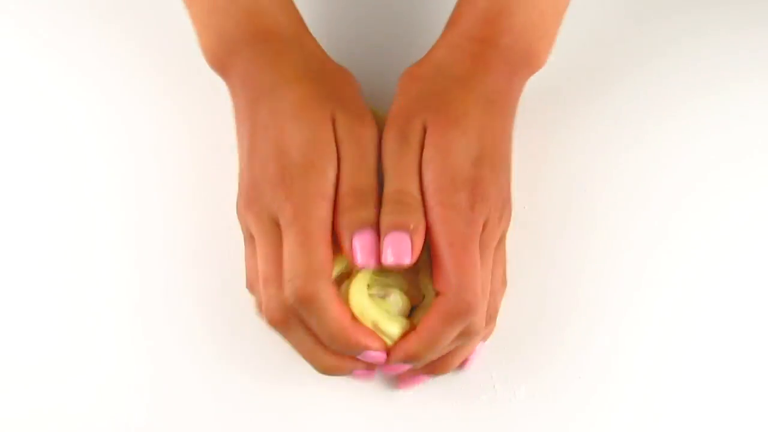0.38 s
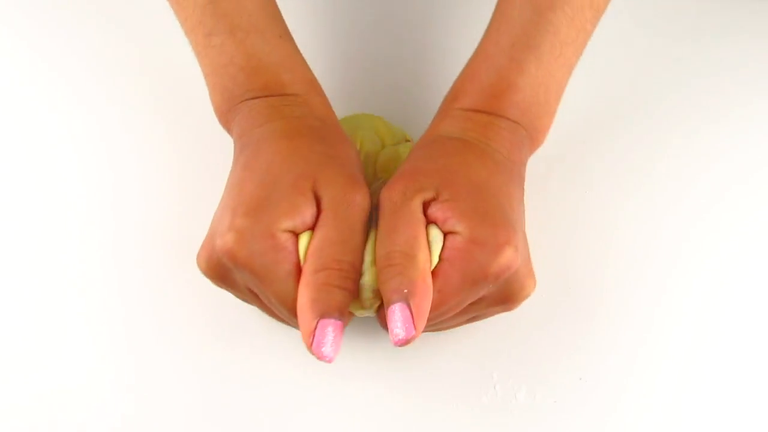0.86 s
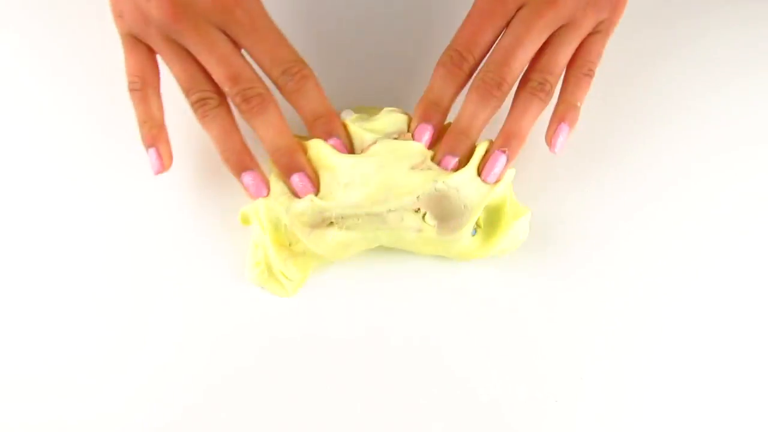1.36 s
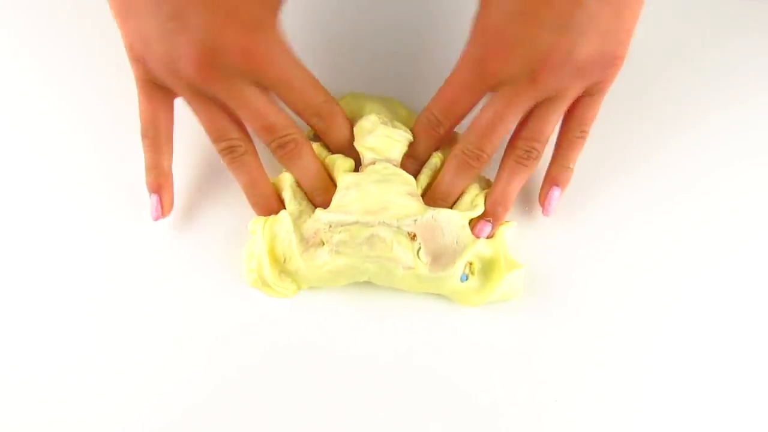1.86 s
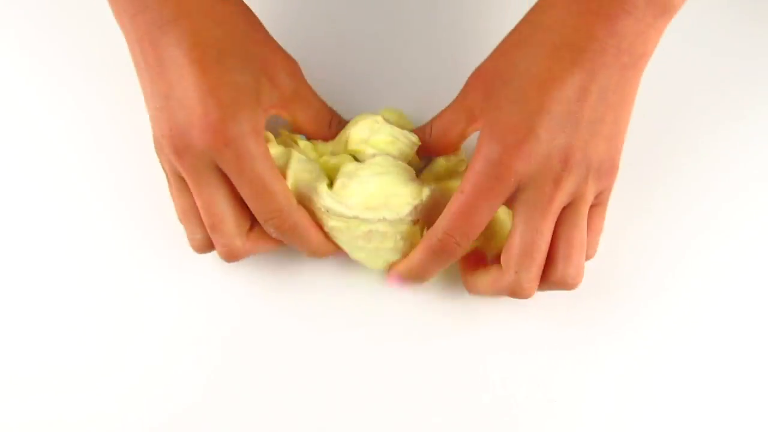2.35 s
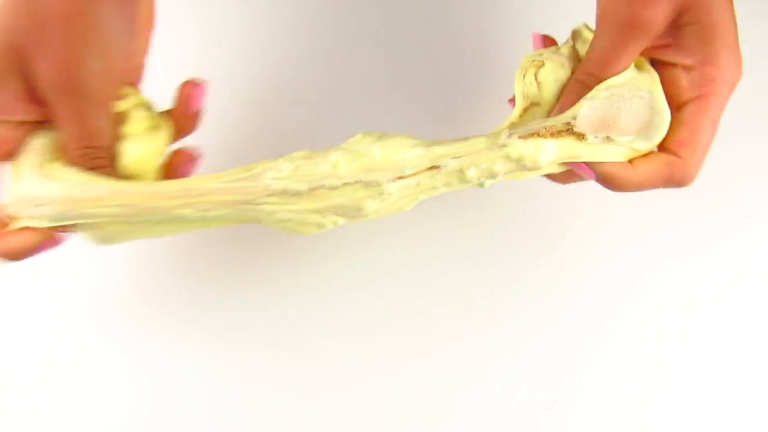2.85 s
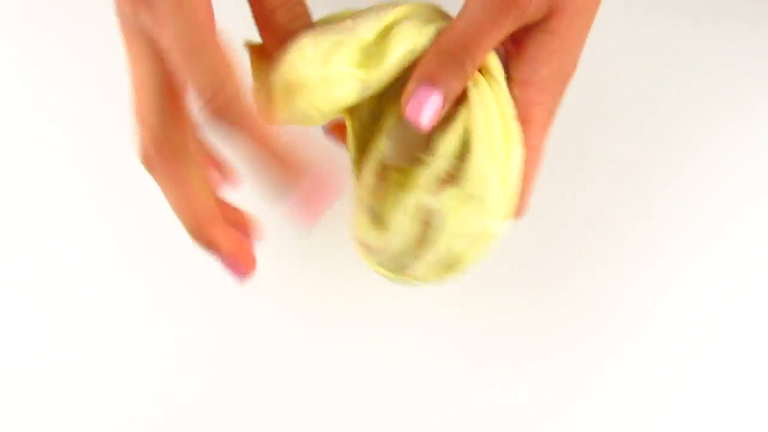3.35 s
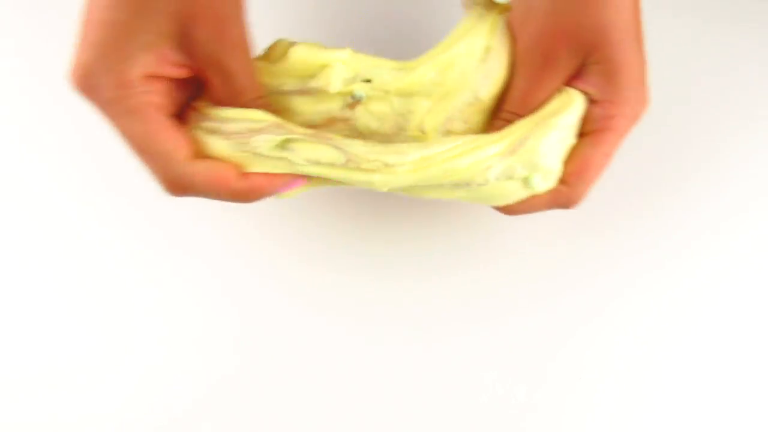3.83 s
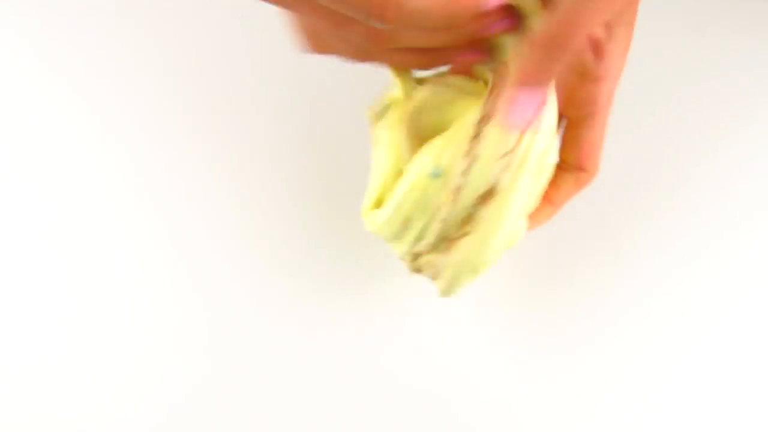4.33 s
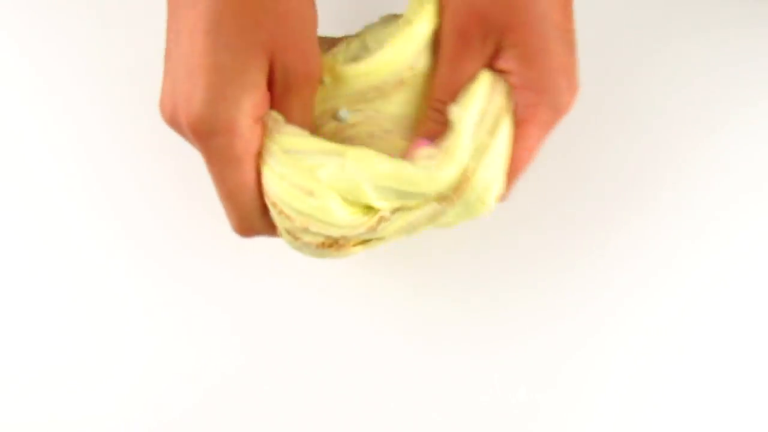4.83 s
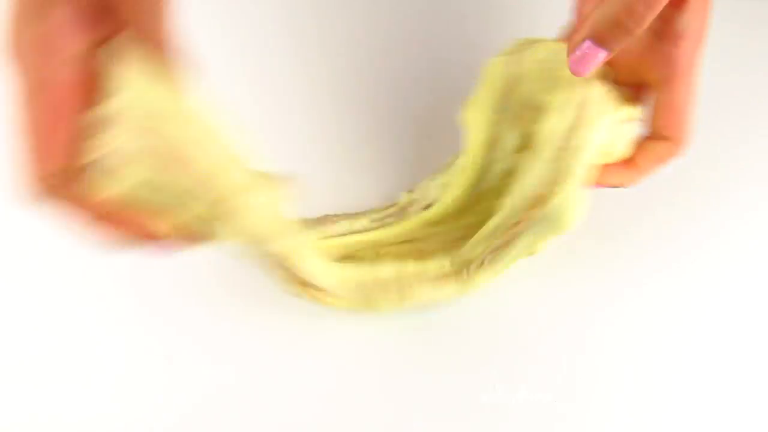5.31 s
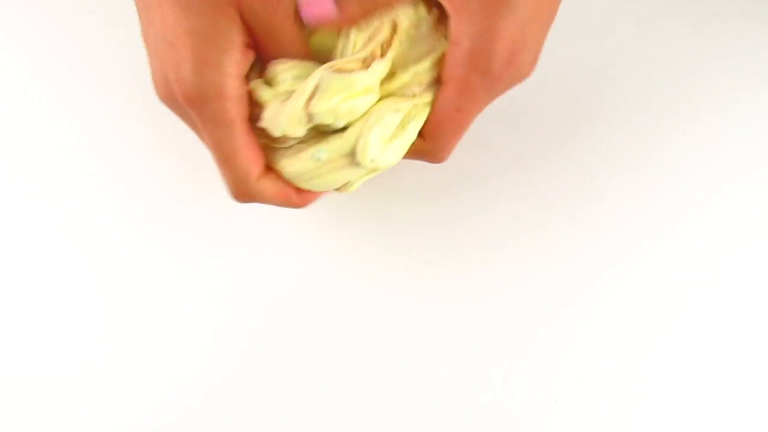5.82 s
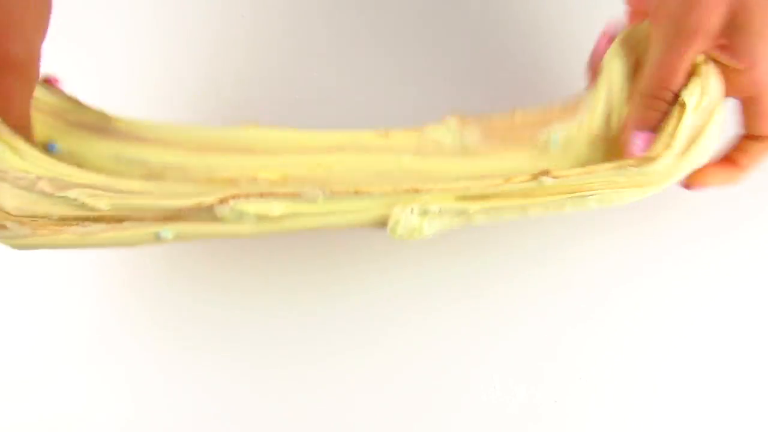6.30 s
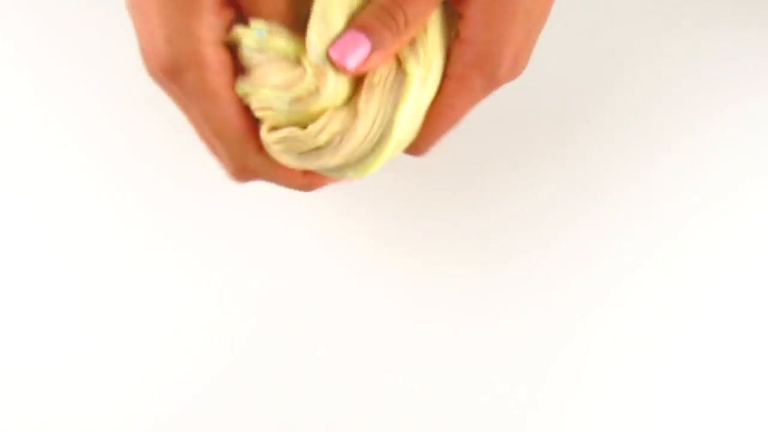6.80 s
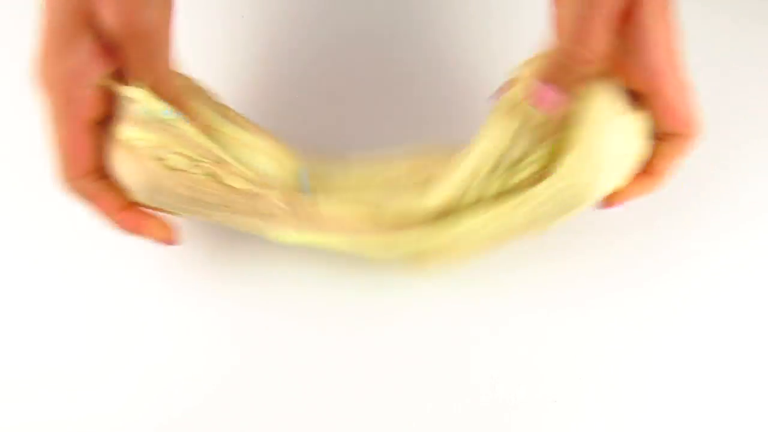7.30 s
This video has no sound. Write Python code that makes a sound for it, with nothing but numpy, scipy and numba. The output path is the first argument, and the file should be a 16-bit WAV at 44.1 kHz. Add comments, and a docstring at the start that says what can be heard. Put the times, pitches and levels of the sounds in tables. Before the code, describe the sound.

Thick slime is kneaded by hand over a table, heard very close in stereo in a small quiet room with a low ventilation hum. It opens with a small sticky peel and soft low bumps around 0.1 s, then a rustling squelch. From 0.5 to 0.9 s air pockets burst in a tight volley of loud, bright, hollow snaps, the strongest near 0.75 and 0.8 s, over wet peeling that trails to about 1.15 s. Then it is sparse: small clicks at 1.3 and 1.5 s, a peel with a dull thump near 1.9 s, wet ticks from 2.2 s and a firm pop at 2.55 s. Fine sticky crackle grows from 2 to 4 s and stays to the end, dotted with little pops. A lone loud pop lands at 5.0 s, short peels follow at 5.2 and 6.3 s, and a last flurry of snaps and squelch runs from 6.85 to 7.4 s.

```python
"""Two hands knead, stretch and fold thick slime over a table, close to a stereo microphone in a small quiet room.
In the first second air pockets burst loudly, sticky skin peels off with a squelch and the lump bumps the table;
smaller pops and peels follow, a steady crackle grows from 2 s to 4 s, a lone loud pop comes near 5 s and
a last flurry near 7 s. Pops and threads are clicks ringing resonators, bumps are pushes ringing the table modes.
Shaped noise gives the ventilation hum under it all; a gain control ducks everything after the loudest pops."""
import sys
import numpy as np
from scipy import signal
from scipy.fft import rfft, irfft, next_fast_len
from scipy.io import wavfile
from scipy.ndimage import uniform_filter1d
from numba import njit

SR = 44100
rng = np.random.default_rng(int(sys.argv[2]) if len(sys.argv) > 2 else 0)


def field_ratio(decibels):
    """Amplitude ratio for a level in dB (20 dB per decade); scalars and array-likes work."""
    return 10 ** (np.asarray(decibels, dtype=float) / 20)


def dump_mix(stems):
    """Bounce the given channels to the path in sys.argv[1] as a 16-bit WAV at rate SR."""
    frames = np.atleast_2d(stems).T  # one column per channel
    limited = np.clip(frames, -1, 1)  # hard clip at full scale
    pcm = np.round(limited * 32767).astype(np.int16)
    wavfile.write(sys.argv[1], SR, pcm)


N = 327222  # length in samples

# resonances of the hollow of the cupped lump: centre_hz, width_hz, gain_db
LUMP = [(239.7, 140, -12.5), (464, 84, 7), (934, 590, -7.5), (1384, 255, 9.5), (2105, 220, 3.5)]
# resonances of the thin film as it snaps: centre_hz, width_hz, gain_db
FILM = [(6760, 1180, -5.5), (8430, 4050, 3), (12300, 3300, -4)]


def pops():
    """Impulse excitation: a pocket tears in a volley of clicks that ring the pocket, the hollow lump and the film."""
    # bursting pockets, levels before the room: start_s, pocket_db, pocket_hz, lump_db, film_db
    bursts = [(0.071, -50, 4770, -50, -47), (0.116, -48.5, 4750, -48, -64), (0.515, -38, 3480, -40, -64),
              (0.584, -65, 4040, -49, -57), (0.625, -42, 5170, -37, -45), (0.6457, -32.5, 3110, -30.5, -36),
              (0.6882, -36.5, 3820, -31, -38.5), (0.699, -48.5, 3980, -46, -46.5),
              (0.712, -59, 3130, -41, -64), (0.7386, -20, 3670, -25.5, -23), (0.7796, -36, 4170, -31, -34),
              (0.7989, -22.5, 6130, -34, -14.5), (0.812, -65, 5330, -30, -20),
              (0.868, -70, 3940, -43.5, -62), (0.9069, -27, 5530, -33, -25),
              (1.281, -35.5, 6150, -46.5, -32.5), (1.45, -60.5, 4650, -70.5, -56),
              (1.49, -62.5, 3430, -50, -59.5), (1.862, -50, 3660, -53.5, -52),
              (1.872, -45, 3970, -43, -41.5), (1.93, -66, 3690, -56, -55), (2.113, -75.5, 2760, -53.5, -63),
              (2.1917, -63, 4220, -54, -72), (2.316, -53, 3830, -47.5, -59), (2.4837, -75, 2810, -46, -56),
              (2.5512, -36.5, 4900, -31.5, -29.5), (2.6465, -62, 5540, -46, -42),
              (2.764, -56, 5400, -62, -57), (3.4384, -61, 3620, -54, -59), (3.541, -56, 4550, -60, -55.5),
              (3.7174, -39, 4780, -40.5, -38), (3.7435, -45, 3850, -34, -38.5),
              (3.9781, -48, 5740, -51.5, -56), (4.098, -44.5, 3330, -69, -48),
              (4.4342, -46, 4200, -49.5, -46.5), (4.525, -57.5, 4410, -71, -56.5),
              (4.757, -86, 2380, -52, -78), (4.8532, -59, 4350, -61, -56.5), (4.891, -68, 4500, -71, -59),
              (4.9366, -57, 2820, -53, -52), (4.9812, -21, 4830, -28, -42), (5.33, -55, 2570, -70, -70),
              (5.3557, -67, 4780, -70, -52), (5.4782, -53, 4450, -52.5, -46.5),
              (5.705, -77, 3400, -54, -66), (5.809, -44.5, 6230, -41.5, -46),
              (5.926, -52, 2880, -37.5, -40), (6.182, -62.5, 4140, -75, -56.5),
              (6.2214, -63, 4080, -76, -53.5), (6.8278, -68, 5710, -59, -53), (6.8498, -38, 4260, -44, -42),
              (6.861, -53, 2630, -41.5, -67), (6.9089, -47.5, 5300, -47.5, -71),
              (7.0562, -28, 3660, -37, -34), (7.101, -41, 5500, -43.5, -70), (7.337, -47.5, 3020, -47, -49),
              (7.3878, -48.5, 4630, -43, -51)]
    tear_ms, tear_law = 3.75, 1.95  # decay time of a 4 kHz pocket; higher ones tear faster by this power
    fizz_db, fizz_s = -17, 0.029
    head = int(.01 * SR)  # levels are the rms of the first 10 ms
    out = np.zeros((2, N))
    t = np.arange(int(.14 * SR)) / SR
    fizz = field_ratio(fizz_db) * np.exp(-t / fizz_s)  # the torn rim keeps fizzing as it collapses
    for start_s, pocket_db, hz, lump_db, film_db in bursts:
        decay = np.exp(-t * 1000 / tear_ms * (hz / 4000) ** tear_law)
        tear = grains(9000, 1.1, len(t)) * (decay + fizz)
        tear[0] = 3.2  # the first rupture
        pocket = ring(tear, [(hz, 0.48 * hz, 0), (2600, 1200, -6)])
        pocket = ring(pocket, [(0.66 * hz, 1.06 * hz, 0)])
        lump = ring(ring(tear, LUMP), [(800, 3040, 0)])
        film = ring(ring(tear, FILM), [(8740, 5300, 0)])
        burst = np.zeros(len(t))
        for part, db in ((pocket, pocket_db), (lump, lump_db), (film, film_db)):
            burst += part * field_ratio(db) / np.sqrt(np.mean(part[:head] ** 2))
        add(out, room(burst), start_s)
    return out


def peel():
    """Superposed random impulses: sticky threads snap; slow wet ones squelch, mid ones rustle, fine ones crackle."""
    # resonances of the peeling skin: centre_hz, width_hz, gain_db
    skin = [(2320, 270, 4), (3470, 3100, 1), (5800, 1500, -7)]
    wet_gain, mid_gain, fine_gain = pull()
    bunch = clumps(60, 1.5)  # threads of all three layers let go together
    wet = grains(1500, 2.73, N) * clumps(45, 3.5)
    mid = grains(4000, 3.06, N) * clumps(55, 3)
    fine = grains(9500, 3.1, N) * clumps(70, 2)
    squelch = set_rms(bunch * ring(ring(wet, LUMP), [(1390, 3400, 0)]), 0) * wet_gain
    rustle = set_rms(bunch * ring(ring(mid, skin), [(3770, 5400, 0)]), 0) * mid_gain
    crackle = set_rms(bunch * ring(ring(fine, FILM), [(10400, 17000, 0)]), 0) * fine_gain
    stray = grains(11, 3, N) * field_ratio(-46.5)  # tiny pockets burst here and there
    close = squelch + rustle + crackle + ring(stray, FILM + skin)
    out = np.zeros((2, N))
    size = SR // 24
    for i in range(0, N, size):  # the hands keep moving, so the echo paths keep changing
        add(out, room(close[i:i + size]), (i + .5) / SR)
    return out


def pull():
    """Amplitude envelopes of the three peeling layers: steady kneading plus each peel's rise, hold and fall."""
    # skin peeling off the hands, levels before the room: start_s, hold_s, squelch_db, rustle_db, crackle_db
    peels = [(0.068, 0.021, -56, -58, -51.5), (0.315, 0.033, -76, -77, -64),
             (0.371, 0.065, -69, -68, -56.5), (0.47, 0.13, -59.5, -65, -60.5), (0.65, 0.2, -50.5, -64, -61),
             (0.999, 0.14, -53, -67.5, -55.5), (1.88, 0.018, -50, -57, -48.5),
             (2.201, 0.069, -57, -62, -63.5), (2.32, 0.067, -56, -59.5, -60.5),
             (2.478, 0.013, -59, -68, -59), (2.91, 0.011, -80, -59.5, -60.5),
             (2.961, 0.015, -53, -60, -53.5), (3.272, 0.0078, -75, -94, -85), (3.343, 0.026, -75, -76, -73),
             (4.098, 0.015, -54, -59.5, -55), (4.13, 0.017, -63.5, -82, -63), (4.22, 0.013, -82, -65, -78),
             (4.664, 0.018, -87, -76, -72), (5.145, 0.012, -72, -80, -62), (5.22, 0.017, -60, -57, -55.5),
             (5.263, 0.017, -57.5, -61, -57), (5.321, 0.019, -64, -73, -70), (6.23, 0.056, -93, -81, -66),
             (6.303, 0.018, -55.5, -55.5, -54.5), (6.458, 0.02, -68, -70, -81),
             (6.48, 0.008, -66, -68, -66), (6.855, 0.024, -60, -78, -76), (7.19, 0.022, -76, -83, -71.5),
             (7.257, 0.029, -51, -49.5, -51.5), (7.345, 0.03, -54, -71, -57.5)]
    # steady stickiness while the lump is worked: time_s, level_db
    kneading = [(0, -82), (0.9, -72.5), (1.3, -92), (2.0, -82.5), (2.6, -66.5), (3.7, -63), (5.0, -62.5),
                (6.0, -62.5), (7.42, -62.5)]
    # share of each layer in the kneading, added to its level: squelch_db, rustle_db, crackle_db
    kneading_mix_db = (-7.5, -9, -6)
    rise_db_per_s, fall_db_per_s = 508, 290.5
    t = np.arange(N) / SR
    steady_db = np.interp(t, *np.transpose(kneading))
    gain = field_ratio(steady_db + np.array(kneading_mix_db)[:, None])
    for start_s, hold_s, *layer_db in peels:
        before_s = np.maximum(start_s - t, 0)
        after_s = np.maximum(t - start_s - hold_s, 0)
        fade_db = rise_db_per_s * before_s + fall_db_per_s * after_s
        gain = gain + field_ratio(np.array(layer_db))[:, None] * field_ratio(-fade_db)
    return gain


def clumps(per_s, depth_db):
    """Random amplitude modulation: threads let go in bunches, so the gain wanders quickly."""
    k = int(SR / per_s)
    steps = np.repeat(rng.standard_normal(N // k + 1), k)
    return field_ratio(depth_db * uniform_filter1d(steps, k)[:N])


def grains(per_s, spread_db, size):
    """Random impulse train: clicks of either sign with exponentially spread dB sizes, a few far louder."""
    happens, sign, rank = rng.random((size, 3)).T
    size_db = -spread_db * np.log(1 - .997 * rank)  # .997 leaves out the rarest giants
    return (happens < per_s / SR) * np.sign(sign - .5) * field_ratio(size_db)


def bumps():
    """Modal excitation: as the lump bumps the table, soft uneven pushes ring the modes of the table top."""
    # pushes, relative levels: start_s, push_db, decay_ms
    pushes = [(0.121, -31.5, 18), (0.144, -32.5, 15), (0.345, -41.5, 19), (0.64, -40.5, 12),
              (1.437, -36, 24), (1.92, -38, 27), (2.356, -34, 18), (7.379, -37.5, 20)]
    # modes of the table top, relative gains: centre_hz, width_hz, gain_db
    table_top = [(66.4, 27, -13.5), (141, 10.6, -1.5), (217, 56, -12.5)]
    force = np.zeros(N)
    t = np.arange(int(.15 * SR)) / SR
    for start_s, push_db, decay_ms in pushes:
        rough = uniform_filter1d(rng.standard_normal(len(t)), 60)
        push = set_rms(rough, -1) * np.exp(-t * 1000 / decay_ms)
        add(push, np.hanning(int(0.0026 * SR)), 0)  # one-sided first contact
        add(force, field_ratio(push_db) * push, start_s)
    return 2.38 * ring(force, table_top)


def ring(x, modes):
    """Modal sum of two-pole resonances (centre_hz, width_hz, gain_db), each scaled from gain 1 at its centre."""
    total = 0
    for hz, width, db in modes:
        b, a = signal.iirpeak(min(hz, .45 * SR), hz / width, SR)
        total = total + field_ratio(db) * signal.lfilter(b, a, x)
    return total


def room(x):
    """Image source and diffuse decay: direct sound, a bounce off the table top, then a short exponential tail."""
    t60_s, tail_db = 0.097, -5  # tail energy relative to the direct sound
    echo_ms = 1.088
    pan_db = -2.3  # left minus right
    t = np.arange(int(.22 * SR)) / SR
    shared = rng.standard_normal(len(t))
    own = rng.standard_normal((2, len(t)))
    spread = shared + 2 * ring(own, [(11000, 8000, 0)]) + .25 * own  # channels differ mostly in the treble
    tail = spread * field_ratio(-60 * t / t60_s) * np.minimum(t / 0.00069, 1)
    response = tail * field_ratio(tail_db) / np.sqrt(np.sum(tail ** 2, axis=1, keepdims=True))
    response[:, 0] += 1  # direct sound
    lag = np.arange(2) * rng.integers(2, 4)  # the bounce reaches the right 2 or 3 samples later
    echo = int(echo_ms * SR / 1000) + rng.integers(-4, 5) + lag
    response[[0, 1], echo] += [.5, .8]
    response *= field_ratio(np.array([[pan_db], [-pan_db]]) / 2) / 1.119
    return signal.fftconvolve(x[None], response, axes=1)


def hum():
    """Interchannel phase: ventilation and hiss as mid and side noise; the low hum is in opposite phase left to right."""
    # spectrum of the sum of the channels, relative: pitch_hz, density_db
    mid_colour = [(15, -31.5), (25, -25), (49, -2), (123, -0.5), (175, -1), (242, -3), (301, -6), (575, -8),
                  (641, -0.5), (754, -16), (1370, -16.5), (3250, -27.5), (10700, -28.5), (14800, -32),
                  (16000, -81.5)]
    # spectrum of the difference of the channels, relative: pitch_hz, density_db
    side_colour = [(15, -41.5), (25, -10.5), (108, 3.5), (326, -2.5), (516, -8), (695, -16), (818, -15),
                   (1330, -20), (3820, -42), (6380, -36.5), (12500, -34.5), (14800, -40), (16000, -61)]
    mid = coloured(mid_colour, -56.5)
    side = coloured(side_colour, -47)
    return np.array([0.85 * (mid + side), 0.98 * (mid - side)])  # a little stronger on the right


def coloured(points, db):
    """Spectral shaping: white noise weighted in frequency to a given colour with one narrow dip."""
    dip_hz, dip_half_width_hz, dip_db = 666, 61, -22
    size = next_fast_len(N)
    hz = np.maximum(np.arange(size // 2 + 1) * SR / size, 1)
    point_hz, point_db = np.array(points).T
    colour_db = np.interp(np.log(hz), np.log(point_hz), point_db)
    colour_db += dip_db * np.exp(-((hz - dip_hz) / dip_half_width_hz) ** 4)
    spectrum = rfft(rng.standard_normal(size)) * field_ratio(colour_db)
    return set_rms(irfft(spectrum, size)[:N], db)


def set_rms(x, db):
    """Mean-square normalisation: scale a sound to an rms level."""
    return x * field_ratio(db) / np.sqrt(np.mean(x ** 2))


def add(out, x, start_s):
    """Linear superposition: mix a short sound in at its start time."""
    i = int(start_s * SR)
    out[..., i:i + x.shape[-1]] += x[..., :N - i]


def scene():
    """Superposition of hands and lump with the background hum."""
    return pops() + peel() + bumps() + hum()


@njit
def follow(x, release):
    """Peak detection: the envelope jumps up at once and decays exponentially."""
    env, e = np.empty(len(x)), 1e-9
    for i in range(len(x)):
        e = max(x[i], e * release)
        env[i] = e
    return env


def band_limit(x):
    """A steep low-pass at the top of the band."""
    return signal.sosfilt(signal.butter(12, 16350, fs=SR, output="sos"), x)


def record(dry):
    """Dynamic compression: gain control ducks everything after a loud pop; the top is cut and peaks clip."""
    knee_db, slope, release_s = -8, 1.2, .3
    env = follow(np.abs(dry).max(axis=0), np.exp(-1 / (release_s * SR)))
    gain = np.minimum(field_ratio(knee_db) / env, 1) ** slope
    gain = uniform_filter1d(gain, 441, origin=220)  # mean of the past 10 ms, so the gain falls late
    low_pass = signal.ellip(7, .5, 55, 15000, fs=SR, output="sos")  # cuts above 15 kHz
    cut = signal.sosfilt(low_pass, dry * gain)
    return band_limit(np.clip(cut, -1, 1))


dry = scene()
out = record(dry)
dump_mix(out)
```